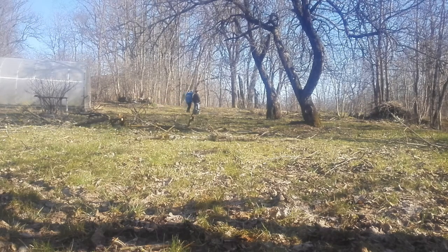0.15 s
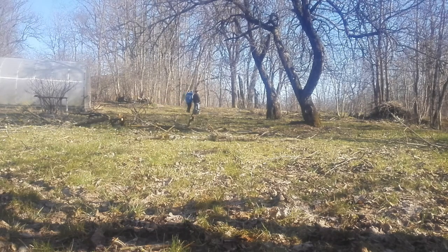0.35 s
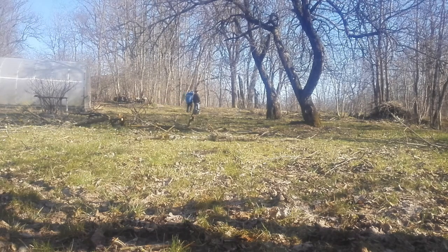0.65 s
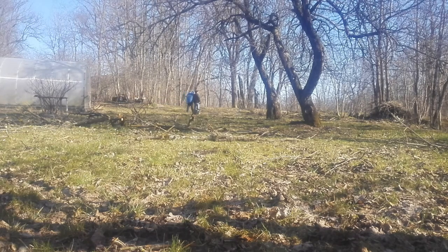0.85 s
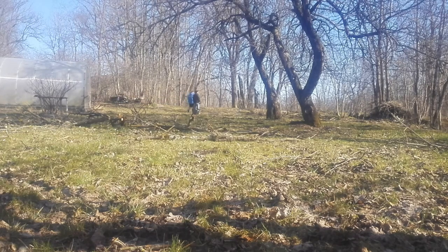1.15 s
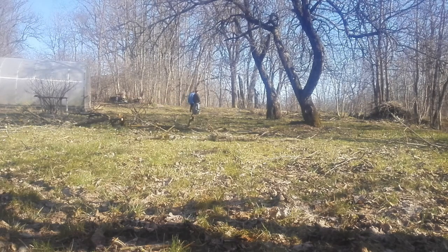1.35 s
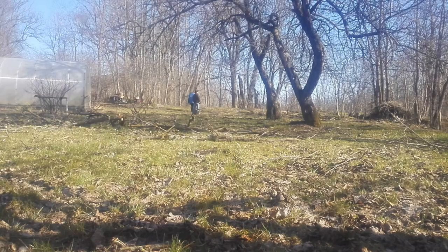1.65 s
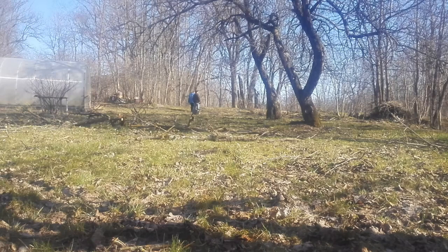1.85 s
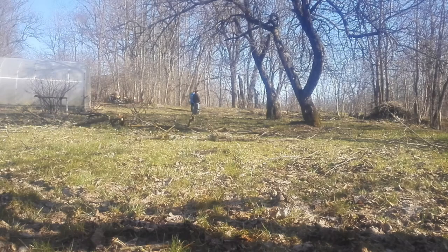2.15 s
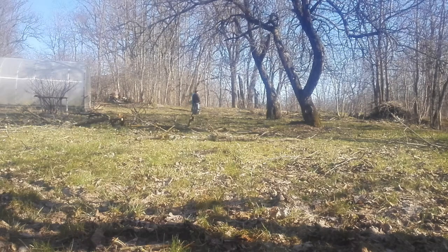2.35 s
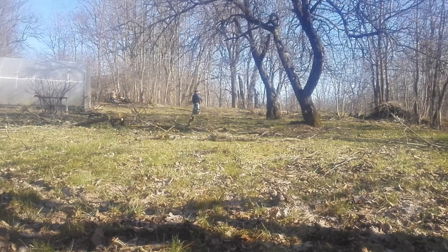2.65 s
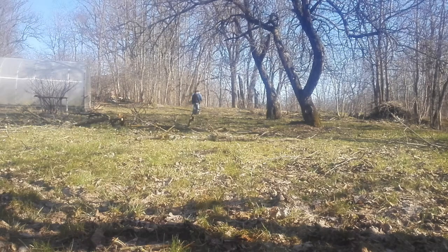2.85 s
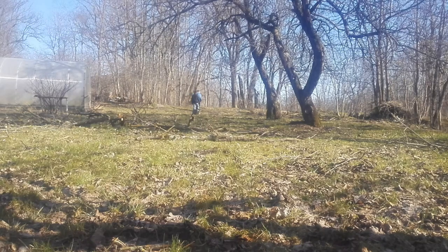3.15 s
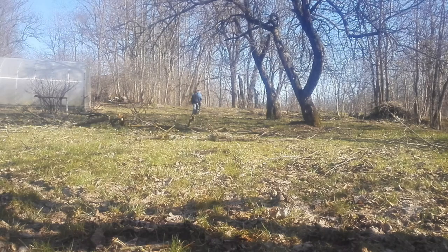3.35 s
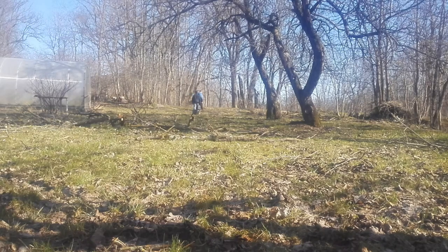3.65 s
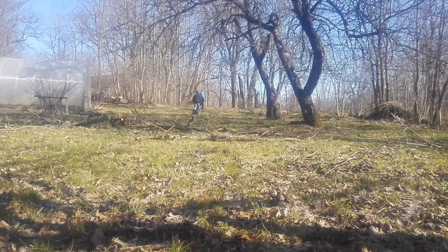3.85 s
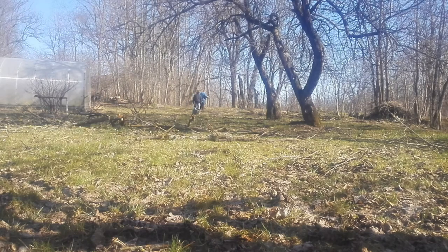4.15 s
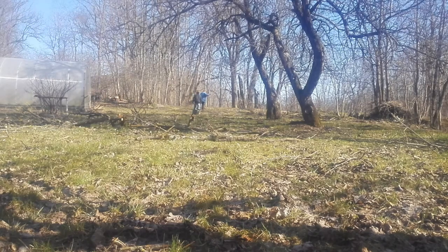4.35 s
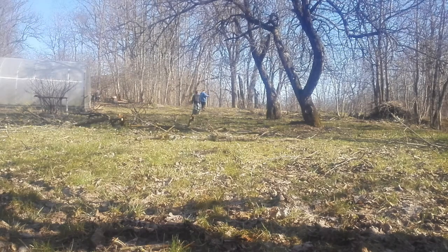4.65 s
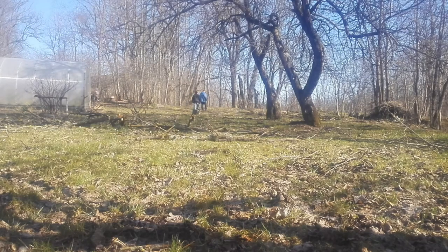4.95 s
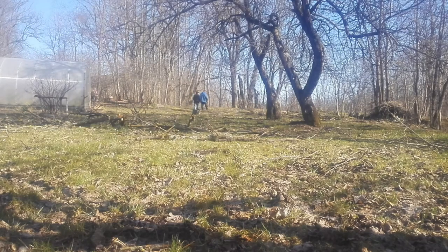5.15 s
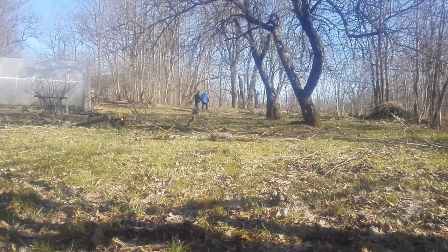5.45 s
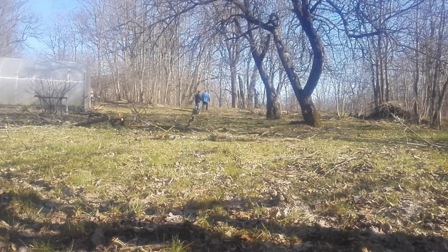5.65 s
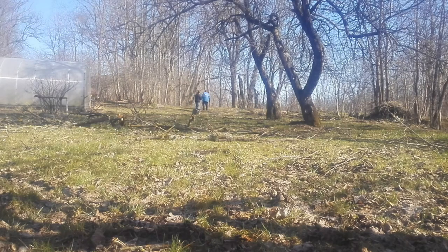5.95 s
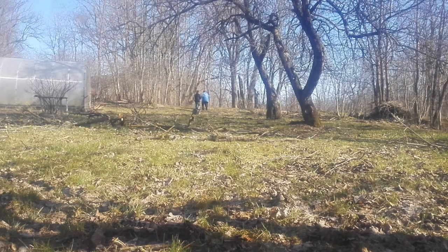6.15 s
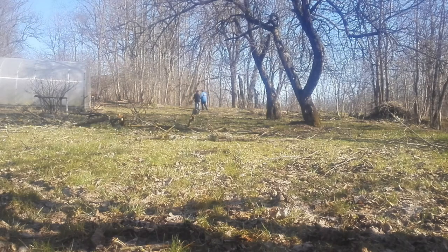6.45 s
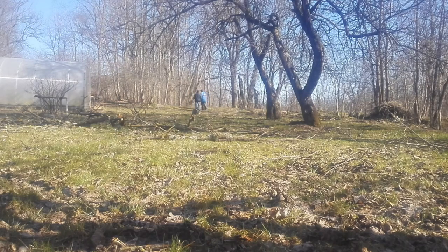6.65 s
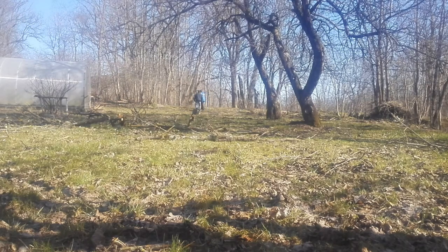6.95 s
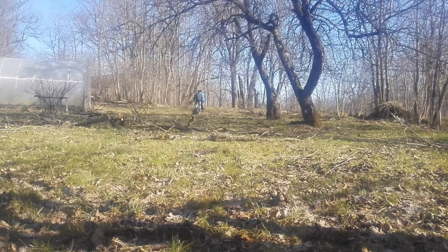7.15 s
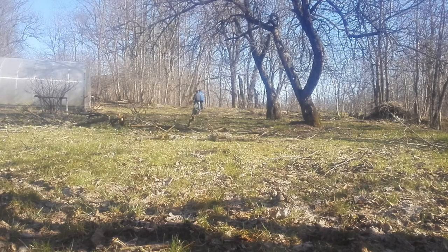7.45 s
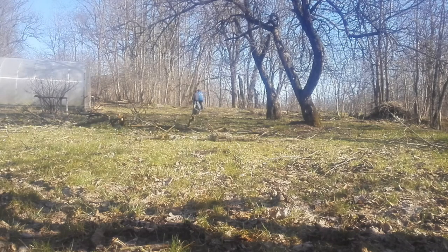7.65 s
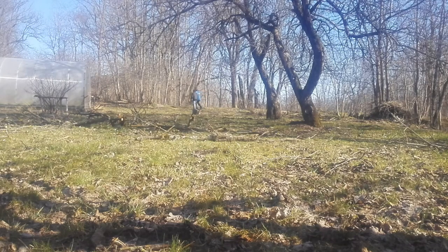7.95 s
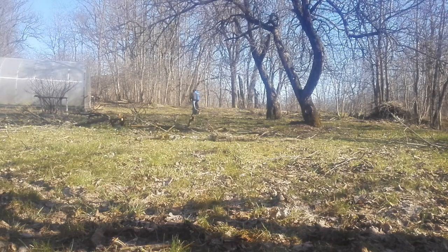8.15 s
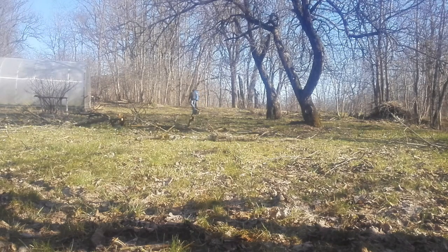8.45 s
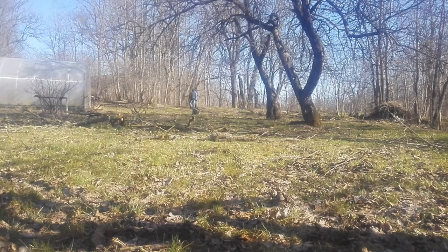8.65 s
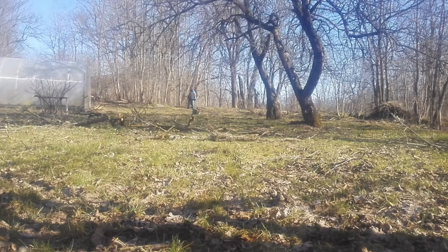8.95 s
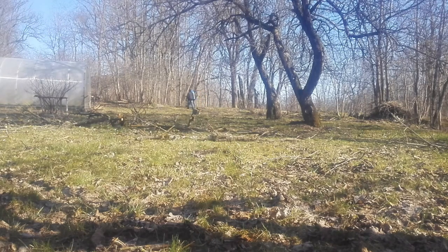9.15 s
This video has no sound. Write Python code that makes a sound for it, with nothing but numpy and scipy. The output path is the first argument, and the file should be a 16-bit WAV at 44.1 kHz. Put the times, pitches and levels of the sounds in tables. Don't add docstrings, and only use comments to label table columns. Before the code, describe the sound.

A lawn tractor idles across a grassy yard, heard by a fixed stereo microphone with light hiss. Its low muffled pulses run together into a throbbing hum, under a thin mechanical rush. Pops cluster near two seconds with brief bird whistles; a heavier thump comes near five. Late on, the engine gets louder, cuts out, bursts with afterfire, and spins down in slowing soft puffs.

```python
import sys
import numpy as np
from scipy import signal
from scipy.fft import rfft, irfft, next_fast_len
from scipy.io import wavfile
from scipy.ndimage import uniform_filter1d, map_coordinates

SR = 44100
rng = np.random.default_rng(int(sys.argv[2]) if len(sys.argv) > 2 else 0)


def wrap_up_sound(samples):
    columns = np.atleast_2d(samples).T
    tamed = np.clip(columns, -1, 1)
    steps = np.round(tamed * 32767).astype(np.int16)
    wavfile.write(sys.argv[1], SR, steps)


def gain_from_decibels(decibels):
    exponent = np.asarray(decibels, float) / 20
    return 10 ** exponent


N = 410571
SPARK_CUT_S = 7.29
SILENT_DB = -120


def unit(x):
    return x / np.sqrt(np.mean(x ** 2) + 1e-20)


def along(points, hz):
    f, *columns = np.transpose(points)
    return np.array([np.interp(np.log(hz + 1), np.log(f + 1), column) for column in columns])


def curves(rows):
    s, *columns = np.transpose(rows)
    return [np.interp(np.arange(N) / SR, s, column) for column in columns]


def wobble(rate_hz):
    knots = rng.standard_normal(int(N * rate_hz / SR) + 4)
    return map_coordinates(knots, [np.arange(N) * rate_hz / SR], order=1)


def filtered(x, response):
    m = next_fast_len(N + SR // 2)
    return irfft(rfft(x, m) * response(np.fft.rfftfreq(m, 1 / SR)), m)[..., :N]


# lag_cycles, ring_hz, ring_ms, swell_ms (past the crest)
FIRING = [
    (-.018, 163, 3.7, 1.8),
    (.25, 168, 4.3, 1.8),
    (-.19, 114, 15, 1.8),
    (-.275, 143, 3.5, 1.8),
]
# lag_cycles, ring_hz, ring_ms, swell_ms
COASTING = [
    (-.01, 148, 2.8, .3),
    (.28, 187, 10, .4),
    (-.18, 104, 14, 0),
    (-.29, 110, 6, .4),
]
# shut_db (throttle shut), open_db (added wide open)
FIRING_DB = [
    (-40.5, 2),
    (-51.5, 4.5),
    (-39, -18),
    (-38.5, -19),
]
# shut_db, open_db
COASTING_DB = [
    (-47, 4),
    (-66, 21),
    (-43, -12),
    (-59, 0),
]
# start_s, peak_db, ring_hz, ring_ms
POPS = [(0.4004, -37.3, 176, 5.2), (0.7888, -31, 158, 1.5), (1.6999, -34.5, 146, 1.5),
        (1.7429, -44, 172, 1.9), (1.751, -33.5, 128, 0.81), (1.7856, -32.5, 180, 0.86),
        (1.888, -31.5, 141, 0.78), (2.2172, -41, 220, 1.2), (4.7334, -32.5, 152, 0.76),
        (6.8483, -39, 210, 2.3), (8.1397, -32.5, 175, 2.2), (8.157, -38.5, 177, 4.4),
        (8.167, -40, 183, 0.99)]
# start_s, peak_db, ring_hz, ring_ms
BUMPS = [
    (1.7, -46, 70, 4),
    (1.79, -57.5, 550, 0.88),
    (1.889, -48, 70.5, 4),
    (2.223, -43.5, 85, 4.7),
    (3.56, -62, 55, 5),
    (4.24, -52, 55, 5),
    (4.728, -39, 71.5, 9.3),
    (7.64, -38.5, 60, 6.9),
    (8.16, -42, 65, 5.8),
    (9.22, -54, 85, 9),
]


def exhaust():
    spark = np.arange(N) / SR < SPARK_CUT_S
    blow, *rest = strokes(FIRING, breathing(FIRING_DB, spark), edge_db=-60, rise_ms=2.57, scatter_db=0.13)
    fired = returned(blow, -3.2) + sum(rest)
    fired = filtered(fired, lambda f: f ** 4 / (f ** 4 + 58 ** 4))

    blow, *rest = strokes(COASTING, breathing(COASTING_DB, ~spark), edge_db=-25, rise_ms=3, scatter_db=.7)
    blow = blow + burning()
    for rows, edge_db in (POPS, -27), (BUMPS, -52):
        for start_s, peak_db, ring_hz, ring_ms in rows:
            shape = puff(ring_hz, 1.4 * np.clip(ring_ms, 1, 9), 1.5, edge_db, rise_ms=5)
            first = round(start_s * SR) - SR // 50
            blow[first:][:len(shape)] += gain_from_decibels(peak_db) * shape
    loose = returned(blow, -16.5) + sum(rest)
    return fired + filtered(loose, lambda f: f ** 2 / (f ** 2 + 25 ** 2))


# time_s, speed_hz (four-stroke cycles per second)
SPEED = [(0.0, 23.182), (0.9, 22.938), (1.7, 23.301), (2.65, 23.142), (3.1, 22.906), (4.1, 22.953),
         (4.45, 23.295), (4.85, 23.029), (5.65, 23.209), (5.95, 22.875), (7.1, 23.842), (7.35, 22.94),
         (7.6, 20.223), (8.25, 15.111), (8.7, 12.126), (9.31, 8.684)]


def crank():
    return np.cumsum(curves(SPEED)[0]) / SR - .2521


# time_s, pressure_db (gas), opening (throttle, 0-1)
EFFORT = [(0, 1, 0.5), (.8, -1, 0.18), (1.6, 0, 0.43), (2.4, -1.5, 0.18), (3.2, 0, 0.26), (4, -2, 0),
          (4.8, 1, 0.24), (5.6, 0.5, 0.86), (6.4, 0, 0.75), (7.28, -0.5, .95), (7.3, -0.5, 0),
          (7.55, 0, 0.37), (7.9, 2, 0.5), (8.16, -0.5, 1), (8.45, 0.5, 0.83), (8.85, -1, 0.63),
          (9.31, -9.5, 0.36)]


def breathing(table, running):
    pressure_db, opening = curves(EFFORT)
    return [np.where(running, shut_db + open_db * opening + pressure_db, SILENT_DB)
            for shut_db, open_db in table]


# lag_cycles, ring_hz, ring_ms, swell_ms
RICH = [(-.025, 195, 1.5, 1.5)]
# lag_cycles, ring_hz, ring_ms, swell_ms
AFTERFIRE = [
    (-.006, 172, 2.2, 1.5),
    (.272, 179, 3.4, 1.5),
    (.1, 62, 6, 1.5),
]
AFTER_FULL_DB = [-31, -30, -47]
# lag_cycles, ring_hz, ring_ms, swell_ms
CRACK = [(-.006, 385, 1.2, 1.5)]


def burning():
    t = np.arange(N) / SR
    ramp = lambda start_s, length_s: np.clip((t - start_s) / length_s, 0, 1)

    rich_from_s, start_db, full_db = 6.92, -35.5, -29
    rich_db = start_db + (full_db - start_db) * ramp(rich_from_s, 0.15)
    rich_db = np.where((t > rich_from_s) & (t < SPARK_CUT_S), rich_db, SILENT_DB)
    rich = strokes(RICH, [rich_db], edge_db=-59, rise_ms=5.2, scatter_db=1.2)[0]
    rich = filtered(rich, lambda f: 1 / (1 + (f / 330) ** 12))

    from_s, until_s, end_s = 7.58, 7.985, 8.11
    alight = (t > from_s) & (t < end_s)
    rising, dying = 1 - ramp(from_s, .115), ramp(until_s, end_s - until_s)
    start_end_db = [(-16, -4), (-30, -22), (-20, -6)]
    after_db = [np.where(alight, full + start * rising + end * dying, SILENT_DB)
                for full, (start, end) in zip(AFTER_FULL_DB, start_end_db)]
    afterfire = strokes(AFTERFIRE, after_db, edge_db=-40, rise_ms=5, scatter_db=1.1)

    crack_db = np.where(alight, -47 - 13 * (t - from_s), SILENT_DB)
    cracks = strokes(CRACK, [crack_db], edge_db=-60, rise_ms=2.5, scatter_db=1.3)
    return rich + sum(cracks + afterfire)


def strokes(shapes, levels_db, edge_db, rise_ms, scatter_db):
    cycles, trains = crank(), []
    for (lag_cycles, ring_hz, ring_ms, swell_ms), level_db in zip(shapes, levels_db):
        at = np.flatnonzero(np.diff(np.floor(cycles - lag_cycles)) > 0)
        train = np.zeros(N)
        train[at] = gain_from_decibels(level_db[at] + scatter_db * rng.standard_normal(len(at)))
        pulse = puff(ring_hz, ring_ms, swell_ms, edge_db, rise_ms)
        trains.append(signal.fftconvolve(train, pulse)[SR // 50:][:N])
        edge_db = -60
    return trains


def puff(ring_hz, ring_ms, swell_ms, edge_db, rise_ms):
    ms = np.arange(SR // 10) / SR * 1000 - 20
    u = (ms - swell_ms) / rise_ms + np.log(ring_ms / rise_ms)
    envelope = np.exp(-u * rise_ms / ring_ms - np.exp(-u))
    ring = envelope / envelope.max() * np.cos(2 * np.pi * ring_hz * ms / 1000)
    edge = np.exp(-(ms / 2.4) ** 2) * np.cos(2 * np.pi * 385 * ms / 1000)
    return ring + gain_from_decibels(edge_db) * edge


def returned(x, level_db):
    return x + gain_from_decibels(level_db) * np.pad(x, (round(9.1 * SR / 1000), 0))[:N]


def flow_db(gas, average_s):
    return 10 * np.log10(np.abs(uniform_filter1d(gas ** 2, round(average_s * SR))) + 1e-9) + 50


# order (multiple of the cycle rate), level_db
ORDERS_HEARD = [(12, 2.5), (14, -5), (16, -6.5), (17, -8.5), (18, -19), (20, -18.5), (22, -16.5), (24, -14),
                (26, -19), (28, -22), (36, -15), (44, -16), (58, -19), (107, -9)]


def block():
    angle = 2 * np.pi * crank()
    tones = np.zeros(N)
    for order, level_db in ORDERS_HEARD:
        tones += gain_from_decibels(level_db + 3 * wobble(8)) * np.sin(order * angle + 1.1 * wobble(9))
    since_cut_s = np.clip(np.arange(N) / SR - SPARK_CUT_S, 0, None)
    level_db = -70.5 + 1.85 * curves(CASING)[0] + 1.5 * curves(EFFORT)[1]
    return gain_from_decibels(level_db - 40 * since_cut_s) * tones


# time_s, facing_db
CASING = [(0, 0.5), (.9, 1.5), (2.2, 0.5), (3.7, -0.62), (5.3, -3), (6.6, -5.5), (7.2, -7)]
# freq_hz, left_db, right_db (per Hz)
HISS = [(370, 2, 1), (755, 4, -1.5), (894, 3.5, 4.5), (1250, 5.5, 2), (1970, 1.5, 7), (2850, 6, 7.5),
        (3640, 3.5, 12), (4280, 1, 9.5), (5130, 5.5, 4.5), (6400, 5, -1), (8100, 6.5, -10),
        (9900, -2.5, -9), (11500, -10.5, -7.5), (14600, -19, -31)]
# freq_hz, correlation (-1 to 1)
SHARED = [(300, 0.77), (700, -0.65), (1400, 0.85), (2000, -0.051), (2800, 0.06), (4200, -0.48),
          (5000, -0.02), (5800, 0.39), (7000, 0.22), (14000, -0.09)]


def casing(gas):
    facing_db, speed = curves(CASING)[0], curves(SPEED)[0]
    speed_db = 20 * np.log10(speed / speed[0])
    rattle_db = -68.5 + 0.21 * facing_db + 2 * speed_db + .28 * flow_db(gas, .12)
    fan_db = -63 + facing_db + 1.57 * speed_db

    turn = lambda f: np.arccos(np.clip(along(SHARED, f)[0], -1, 1)) / 2
    noise = rng.standard_normal((2, N))
    mid, side = filtered(noise, lambda f: np.array([np.cos(turn(f)), np.sin(turn(f))]))
    ground = lambda f: 1 + gain_from_decibels(-10) * np.exp(-2j * np.pi * f * .00218) / (1 + (f / 5000) ** 2)
    color = lambda f: gain_from_decibels(along(HISS, f)) * ground(f) * (f > 330)
    rush = filtered(np.array([mid + side, mid - side]), color)
    low = filtered(rush, lambda f: 1 / (1 + (f / 2000) ** 4))

    throb = gain_from_decibels(0.47 * np.cos(2 * np.pi * crank()) + 0.3 * wobble(7))
    rattle = gain_from_decibels(rattle_db + 0.63 * wobble(2.82)) * unit(low)
    fan = gain_from_decibels(fan_db + 0.36 * wobble(4)) * unit(rush - low)
    return throb * (rattle + fan)


# freq_hz, level_db (per Hz)
RUMBLE = [(20, -47), (40, -2), (70, 2.5), (110, 3.5), (200, 9.5), (280, -3.5), (390, -11), (440, -25),
          (600, -38), (700, -51), (900, -70)]


def rumble(gas):
    mid, side = filtered(rng.standard_normal((2, N)), lambda f: gain_from_decibels(along(RUMBLE, f)[0]))
    level_db = -62 + .72 * flow_db(gas, .1)
    return gain_from_decibels(level_db) * unit(mid + gain_from_decibels(-9) * side * [[1], [-1]])


# later_s (into the call), length_s, start_hz, end_hz, level_db
CALL = [
    (0, 0.029, 4300, 5100, -3),
    (.025, .03, 5250, 5040, 3),
    (.03, .03, 4700, 4600, 0),
    (.03, .03, 6100, 6050, -3),
    (0.047, 0.0325, 5150, 4700, -6),
]
# start_s, level_db, pitch_factor
BIRD = [
    (1.503, -76, 1.0),
    (1.642, -71, 1.0),
    (1.752, -68, 1.0),
    (1.885, -80, .97),
]
# start_s, length_s, start_hz, end_hz, level_db
PEEPS = [
    (3.16, 0.018, 6400, 6400, -70.5),
    (9.18, .03, 4270, 4300, -85),
]


def bird():
    song = np.zeros(N + SR)
    notes = [(start_s + later_s, length_s, factor * start_hz, factor * end_hz, call_db + level_db)
             for start_s, call_db, factor in BIRD
             for later_s, length_s, start_hz, end_hz, level_db in CALL]
    for start_s, length_s, start_hz, end_hz, level_db in notes + PEEPS:
        u = np.linspace(0, 1, round(length_s * SR))
        arch = np.sin(np.pi * u)
        pitch_hz = start_hz + (end_hz - start_hz) * u + 149 * arch
        whistle = arch * np.sin(2 * np.pi * np.cumsum(pitch_hz) / SR)
        song[round(start_s * SR):][:len(u)] += gain_from_decibels(level_db + rng.normal(0, 2)) * whistle

    t = np.arange(SR // 8) / SR
    trees = rng.standard_normal((2, len(t))) * gain_from_decibels(-60 * t / .12)
    wet = signal.fftconvolve(song[None], trees / np.linalg.norm(trees[0]), axes=1)
    rasp = gain_from_decibels(2.5 * wobble(300))
    return (rasp * song[:N] + gain_from_decibels(-7) * wet[:, :N]) * gain_from_decibels([[2], [8.5]])


def scene():
    lead_s, lead_rad = 0.00014, 0.02
    lead = lambda f: np.exp(1j * (np.pi * f * lead_s + lead_rad) * np.array([[1], [-1]]))
    gas = exhaust()
    return filtered(gas + block(), lead) + rumble(gas) + casing(gas) + bird()


def top_cut(x):
    return signal.sosfilt(signal.butter(12, 14270, fs=SR, output="sos"), x)


# freq_hz, level_db (per Hz)
SELF_NOISE = [(20, -27), (60, -14), (300, -1.5), (700, -8), (1100, -6), (2500, -9.5), (6000, -11.5),
              (10000, -13.5), (14500, -11.5)]
# center_hz, width_hz, left_db, right_db
PORTS = [(1500, 75, 1.5, 0), (3710, 540, -40, 2.5), (4300, 100, -1, -11), (7070, 680, -13, -6),
         (11080, 1000, -30, -6.5)]


def record(dry):
    def color(f):
        power = gain_from_decibels(along(SELF_NOISE, f)) ** 2
        for center_hz, width_hz, left_db, right_db in PORTS:
            peak = 1 / (1 + (2 * (f - center_hz) / width_hz) ** 4)
            power = power + gain_from_decibels([[left_db], [right_db]]) ** 2 * peak
        return np.sqrt(power)

    noise = filtered(rng.standard_normal((2, N)), color)
    noise *= gain_from_decibels(1.2 * np.array([wobble(2.8), wobble(5)]))
    return top_cut(dry + gain_from_decibels(-59.5) * noise)


dry = scene()
out = record(dry)
wrap_up_sound(out)
```